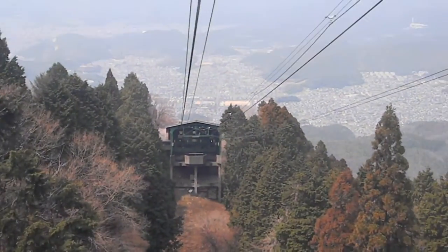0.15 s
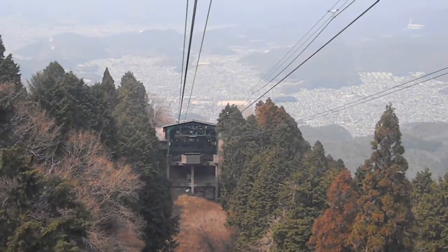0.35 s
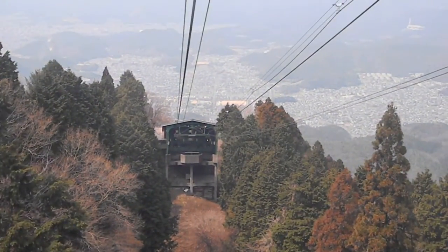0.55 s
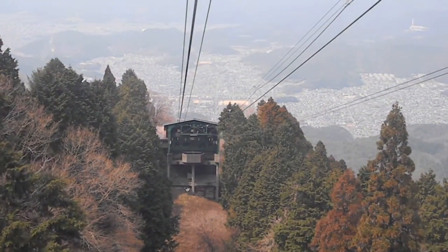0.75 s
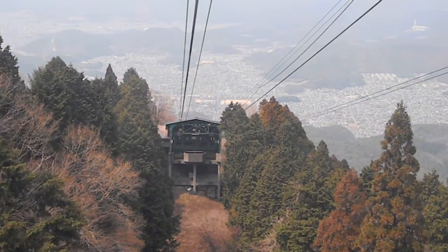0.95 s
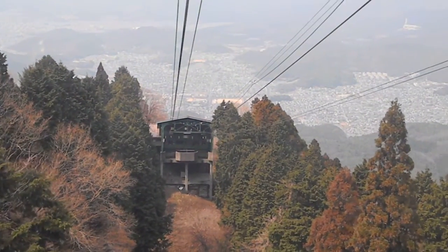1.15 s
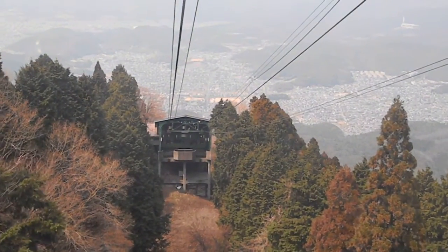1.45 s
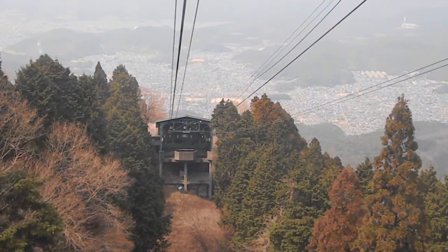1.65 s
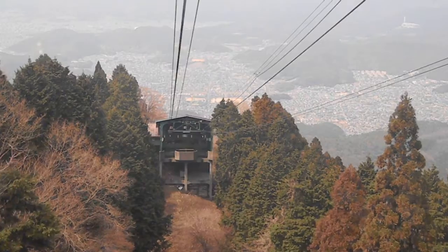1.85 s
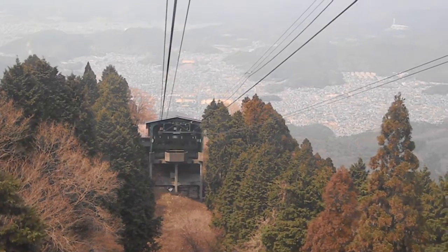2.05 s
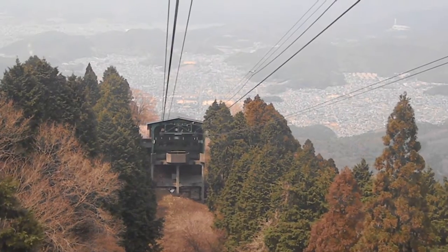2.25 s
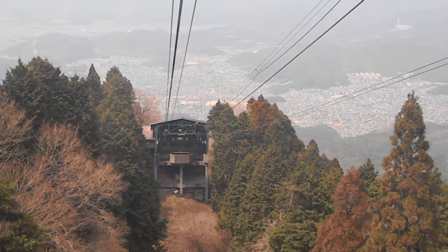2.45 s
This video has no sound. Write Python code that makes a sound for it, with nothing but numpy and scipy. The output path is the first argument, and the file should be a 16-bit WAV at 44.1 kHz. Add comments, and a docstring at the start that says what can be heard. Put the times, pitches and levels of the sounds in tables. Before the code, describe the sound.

Inside a moving cable car cabin, a deep rumble throbs unevenly under a wavering low hum, with panels buzzing softly; small ticks and knocks come and go, and one clearer scuff sounds half way.

```python
"""A deep rumble fills a cable car cabin gliding along its ropes: noise shaped by low modes, with short throbs.
A wandering sine near 200 Hz hums and fades late; the carriage's rolling noise rings in the cabin's panels.
Enveloped noise makes three scuffs, the strongest half way, and the light knocks of fittings, each with a contact.
Decaying pulses make thin ticks; faint whines, a narrow singing band and a hiss of air lie behind."""
import sys
import numpy as np
from scipy import signal
from scipy.fft import rfft, irfft
from scipy.io import wavfile

SR = 44100
rng = np.random.default_rng(int(sys.argv[2]) if len(sys.argv) > 2 else 0)


def store_wav(level_fs):
    """Save 16-bit WAV to argv[1]."""
    pcm = np.round(np.clip(np.atleast_2d(level_fs), -1, 1) * 32767)
    wavfile.write(sys.argv[1], SR, pcm.T.astype(np.int16))


N = 114660
SIDES = np.array([[.5], [-.5]])  # shares a left-right difference between left and right


def amp(db):
    """Logarithmic level: decibels become a linear gain."""
    return 10 ** (np.asarray(db) / 20)


def evened(x):
    """Normalisation: the signal is scaled to rms 1."""
    return x / np.sqrt(np.mean(x ** 2) + 1e-20)


def bins(size=N):
    """Fourier analysis: the frequencies in Hz of a spectrum of the given length."""
    return np.fft.rfftfreq(size, 1 / SR)


def read(points, hz):
    """Interpolation on a logarithmic frequency axis."""
    f, value = np.transpose(points)
    return np.interp(np.log(hz + 1), np.log(f + 1), value)


def curve(points, axis=1):
    """Linear interpolation of one table column over time."""
    rows = np.array(points)
    return np.interp(np.arange(N) / SR, rows[:, 0], rows[:, axis])


def lifts(modes, hz):
    """Resonance: each mode raises or lowers the spectrum in dB around its frequency."""
    return sum(db / (1 + (2 * (hz - f) / width) ** 2) for f, width, db in modes)


def noise(db, same, size=N):
    """Partial coherence: a shared and an opposed random-phase spectrum make stereo noise of rms 1."""
    shared, opposed = np.exp(2j * np.pi * rng.random((2, size // 2 + 1)))
    same = np.clip(same, -1, 1)
    mid = shared * np.sqrt(1 + same)
    side = opposed * np.sqrt(1 - same)
    return evened(irfft(np.array([mid + side, mid - side]) * amp(db), size))


def drift(rate_hz):
    """Random modulation: low-passed noise of rms 1, without its mean."""
    hz = bins()
    lowpass = (hz > 0) / (1 + (hz / rate_hz) ** 4)
    return evened(irfft(rfft(rng.standard_normal(N)) * lowpass, N))


def add(mix, s, sound):
    """Superposition: a sound is summed into the mix from time s in seconds."""
    start = round(s * SR)
    sound = sound[..., max(-start, 0):]
    part = mix[:, max(start, 0):][:, :sound.shape[-1]]
    part += sound[..., :part.shape[1]]


# Spectrum of the cabin rumble. Each row: frequency in Hz, relative density in dB per Hz.
RUMBLE_SPECTRUM = [(10, -36), (24, -21.5), (35, -27.5), (44, 0.5), (55, -4), (80, 0), (105, -0.5), (135, 0),
                   (165, -5.5), (220, -5.5), (262, -1), (295, -7.5), (322, -14.5), (400, -17.5),
                   (520, -34.5), (1000, -65.5), (3000, -100)]
# Modes of the cabin. Each row: frequency in Hz, width in Hz, lift in dB (negative for a dip).
CABIN_MODES = [(44.4, 12, 2.5), (70, 9.1, 8), (86, 1.6, -11), (130.3, 3.8, -1), (139, 1.2, 7.5),
               (156.5, 2.2, 6.5), (182.4, 0.53, 15.5), (248, 1.4, 3), (271.3, 8.4, 2.5), (294, 1.4, -0.5),
               (356.6, 6.1, 8)]
# Left-right likeness of the rumble. Each row: frequency in Hz, correlation from -1 to 1.
RUMBLE_LIKENESS = [(25, 0.63), (50, 1), (100, 0.99), (250, 0.98)]
# Stereo balance of the rumble. Each row: frequency in Hz, left minus right in dB.
RUMBLE_BALANCE = [(50, -1.9), (110, 0.5), (200, 0), (300, -2.5), (380, -1.5), (450, -9.5)]


def rumble(level_db=-12):
    """Modal resonance: the cabin shell booms in its low modes; the level is that before swelling()."""
    hz = bins()
    spectrum = read(RUMBLE_SPECTRUM, hz) + lifts(CABIN_MODES, hz)
    balance = SIDES * read(RUMBLE_BALANCE, hz)
    return noise(spectrum + balance, read(RUMBLE_LIKENESS, hz)) * amp(level_db)


# Throbs of the cabin shell as the carriage jolts.
# Each row: time of the crest in seconds, rms level at the crest in dB, pitch at the crest in Hz,
# length in seconds from the crest to 1/e^2 of its amplitude.
SHELL_THROBS = [(.13, -21, 64.6, 0.05), (0.247, -17, 74, 0.025), (.412, -13, 74.9, .035),
                (.573, -17, 76.6, 0.048), (.728, -13.5, 73.9, 0.017), (.88, -15.5, 78.7, 0.043),
                (.963, -19.5, 131, 0.087), (1.032, -12.5, 73.8, 0.023), (1.136, -23, 133.8, 0.06),
                (1.343, -16, 71.2, 0.029), (1.4, -15, 142, 0.04), (1.479, -12.5, 135.7, 0.045),
                (1.491, -11.5, 68.5, .025), (1.636, -14.5, 82.7, 0.031), (1.943, -13.5, 76, 0.024),
                (2.047, -10.5, 137.7, 0.045), (2.216, -19, 65.2, 0.035), (2.234, -13.5, 132, 0.052),
                (2.395, -15.5, 84.8, 0.026), (2.554, -10, 85, 0.032)]


def throb(level_db, hz, length, sag=0.0581):
    """Transient modal vibration: a low mode swells and sinks about a central crest while its pitch sags."""
    t = np.arange(-SR // 4, SR // 4) / SR
    pitch = hz * (1 - sag * np.tanh(t / length))
    turns = np.cumsum(pitch) / SR + rng.random()
    swell = np.exp(-2 * (t / length) ** 2)
    return np.sqrt(2) * amp(level_db) * swell * np.sin(2 * np.pi * turns)


HUM_HZ, HUM_WANDER_HZ = 203.4, 1.33  # mean pitch, rms wander
HUM_DB, HUM_FLUTTER_DB = -19.5, 2.25  # base level, rms flutter
# Course of the hum. Each row: time in seconds, change from the base level in dB.
HUM_COURSE = [(0, 1), (.25, -2.5), (.42, 2), (.66, -3), (.79, 3), (.91, -5.5), (1.09, 5), (1.16, 2),
              (1.23, 5.5), (1.4, -0.5), (1.61, -1), (1.73, 3), (1.87, -6.5), (2.1, -11.5), (2.22, 1),
              (2.32, -17), (2.44, -4), (2.6, -25)]


def hum():
    """Frequency and amplitude modulation: one wavering tone from the running gear."""
    turns = np.cumsum(HUM_HZ + HUM_WANDER_HZ * drift(rate_hz=7.6)) / SR
    level_db = HUM_DB + curve(HUM_COURSE) + HUM_FLUTTER_DB * drift(rate_hz=32)
    return np.sqrt(2) * np.sin(2 * np.pi * turns) * amp(level_db)


# Spectrum of the rolling noise. Each row: frequency in Hz, relative density in dB per Hz.
ROLL_SPECTRUM = [(60, -15.5), (250, -16.5), (340, -1.5), (430, 1), (500, -6.5), (700, -7), (820, -10),
                 (1050, -10.5), (1110, -18.5), (1600, -18), (1950, -20), (2200, -27), (2800, -32),
                 (4000, -39), (7000, -58.5), (16000, -73)]
# Ringing panels. Each row: frequency in Hz, width in Hz, lift in dB.
PANEL_MODES = [(359, 2.8, 9), (410, 30, 7.5), (531, 80, 5), (567, 32, 3.5), (660, 11, 2), (690, 12, -0.5),
               (717, 9.7, -0.5), (738, 9.1, 9.5), (874, 20, 7), (942, 26, 6), (1002, 7.3, 0.5),
               (1026, 20, 4.5), (1207, 13, 8), (2424, 89, 7.5), (3720, 130, 1.5)]
# Stereo balance of the rolling. Each row: frequency in Hz, left minus right in dB.
ROLL_BALANCE = [(200, -1), (420, -9.5), (470, 1), (510, -2.5), (560, -9.5), (950, -4.5), (1030, -5),
                (1150, -4), (1220, -2), (1500, -3.5), (2500, -1.5), (4000, 1)]
# Left-right likeness of the rolling, shared by the singing. Each row: frequency in Hz, correlation from -1 to 1.
ROLL_LIKENESS = [(200, 0.27), (450, 1), (700, 0.85), (1000, 0.38), (2000, 0.14), (4000, 0.22)]
# Stereo phase of the rolling. Each row: frequency in Hz, lead of the left in radians.
ROLL_LEAD = [(200, .3), (400, 1.21), (600, 1.94), (1000, 1.2), (3000, 2)]


def rolling(level_db=-28, flutter_db=1.12):
    """Forced vibration: wheels on the rope excite the panels, mostly on the right; level before swelling()."""
    hz = bins()
    z = rfft(noise(read(ROLL_SPECTRUM, hz) + lifts(PANEL_MODES, hz), read(ROLL_LIKENESS, hz)))
    z = z * amp(SIDES * read(ROLL_BALANCE, hz))
    z = z * np.exp(1j * SIDES * read(ROLL_LEAD, hz))
    return evened(irfft(z, N)) * amp(level_db + flutter_db * drift(rate_hz=22))


# Pitches that mostly cancel at the listener's place in the cabin.
# Each row: frequency in Hz, width in Hz, change in dB (one is a slight lift).
CABIN_NULLS = [(205, 10, -15), (270.6, 4.3, -3.5), (318, 5.8, 2), (383.2, 15.3, -8), (490, 14, -3.5),
               (540, 3.8, -2.5), (895, 16, -6), (854, 9, -4.5)]
# Centres in Hz of the five overlapping bands of the ride noise, from bass to top.
BAND_CENTRES = [75, 140, 260, 400, 800]
# Course of the bands. Each row: time in seconds, then the change in dB of the bass, low middle, middle,
# upper middle and top.
BAND_COURSE = [(0, 7.5, -9, 2, -1, 0.5), (.2, -8, 3, 1.5, -2, 0), (.38, 1.5, -3.5, -1, 1.5, 2),
               (.5, -4, -7, 5, -3, 0), (.64, -5, 0, 0.5, -0.5, 0), (.85, -6.5, 2.5, 2, -1.5, -2),
               (1.03, -7.5, 0, -1, -1.5, -0.5), (1.27, -4.5, 0, 1, -1.5, 1), (1.48, -8, -4.5, 2, -5, -1),
               (1.65, -4, -0.5, 1.5, -0.5, 1.5), (1.85, -4.5, 0, 2, -1, -1.5),
               (2.03, -3.5, 0.5, -1.5, 0.5, 1), (2.23, 2.5, 0.5, 0, 4, 0.5), (2.43, -2.5, -2, -1, 3.5, 0.5),
               (2.6, -9, 1, 2.5, 3, 3.5)]


def swelling(x):
    """Interference and band modulation: a few pitches cancel; each band rises and sinks on its own."""
    hz = bins()
    z = rfft(x) * amp(lifts(CABIN_NULLS, hz))
    out = 0
    for k, share in enumerate(np.eye(len(BAND_CENTRES))):
        crossfade = read(list(zip(BAND_CENTRES, share)), hz)
        band = irfft(z * crossfade, N)
        out = out + band * amp(curve(BAND_COURSE, axis=k + 1))
    return out


SCUFF_RISE_S, SCUFF_LIKENESS, SCUFF_TREBLE_DB_PER_S = 0.0044, 0.55, 49  # the last is extra treble decay
SCUFF_LEAD_S, SCUFF_LEAD_DB = .03, -12  # a lighter touch swells just before each scuff bites
# Scuffs. Each row: time of the bite in seconds, level in dB, hold in seconds, 60 dB decay in seconds.
SCUFF_EVENTS = [(0.096, -44, 0.0037, 0.14), (1.26, -38, 0.03, 0.38), (2.206, -48, 0.011, 0.17)]
# Spectrum of a scuff. Each row: frequency in Hz, relative density in dB per Hz.
SCUFF_SPECTRUM = [(600, -25), (1400, -13.5), (2100, -0.5), (3000, -1), (4000, 2), (5000, -4), (7000, -6.5),
                  (9000, -7), (12000, -18), (16000, -20.5)]
# Metallic ring of a scuff. Each row: frequency in Hz, width in Hz, lift in dB.
SCUFF_MODES = [(3900, 60, 3), (3800, 260, 3.3), (3080, 200, 2.4), (4330, 230, 3.5), (4750, 140, 2.5),
               (5210, 70, 3.5), (5530, 100, 2.8), (5900, 170, 4), (8150, 120, 4)]


def scuff(level_db, hold, t60, grain_db=-0.5, split_hz=6000):
    """Sliding friction: a short grainy rub with a metallic ring; its treble dies first."""
    t, hz = np.arange(SR) / SR - SCUFF_LEAD_S, bins(SR)
    rub = noise(read(SCUFF_SPECTRUM, hz) + lifts(SCUFF_MODES, hz), SCUFF_LIKENESS, size=SR)
    body = irfft(rfft(rub) / (1 + (hz / split_hz) ** 4), SR)
    treble = rub - body
    rub = body + treble * amp(-SCUFF_TREBLE_DB_PER_S * np.maximum(t, 0))
    touch = amp(SCUFF_LEAD_DB) * np.minimum(t / SCUFF_LEAD_S + 1, 1)
    bite = np.clip(t / SCUFF_RISE_S + 1, 0, 1)
    decay_db = -60 * np.maximum(t - hold, 0) / t60
    grain = grain_db * drift(rate_hz=620)[:SR]
    return rub * np.maximum(bite, touch) * amp(level_db + decay_db + grain)


KNOCK_RISE_S, KNOCK_LIKENESS, KNOCK_CHATTER_DB = 0.0033, 0.62, 1.5
CONTACT_DB = 9  # peak of the contact over the rattle's level
# Light knocks. Each row: start in seconds, rattle level before rise and decay in dB, centre in Hz,
# spread in octaves, 60 dB decay in seconds.
KNOCK_EVENTS = [(0.096, -49, 7140, 1.2, 0.044), (.463, -47, 4250, 0.21, 0.048),
                (0.618, -34.5, 1200, 0.28, 0.038), (0.721, -47.5, 4540, 0.41, 0.079),
                (0.799, -41.5, 2040, 0.51, .03), (0.92, -42, 3370, .13, 0.054),
                (.9205, -37, 1640, 0.28, .02), (1.067, -51, 4170, 0.33, .06),
                (1.09, -43.5, 9000, .6, 0.028), (1.129, -49.5, 3970, 0.27, 0.05),
                (1.205, -49, 6000, 1, 0.077), (1.257, -27, 3200, 1.1, 0.031), (2.01, -45, 4540, 1.1, 0.011),
                (2.042, -42.5, 5000, 0.55, 0.023), (2.073, -38.5, 4500, 1.1, .022),
                (2.093, -52.5, 4700, 0.4, .08), (2.11, -43, 4160, 0.55, 0.055),
                (2.109, -36.5, 1770, 0.11, 0.071), (2.149, -47, 5000, 1, 0.054), (2.167, -40, 4800, 1, .03),
                (2.201, -42.5, 3200, 1.3, 0.06), (2.425, -50, 8000, 0.55, 0.067)]


def knock(level_db, centre_hz, spread, t60):
    """Impact excitation: a loose fitting makes a sharp contact and a quickly damped rattle."""
    size = SR // 2
    t, hz = np.arange(size) / SR, bins(size)
    octaves = np.log2((hz + 1) / centre_hz)
    colour = -20 * np.log10(1 + (octaves / spread) ** 2)
    envelope = np.minimum(t / KNOCK_RISE_S, 1) * amp(-60 * t / t60)
    chatter = evened(amp(KNOCK_CHATTER_DB * drift(rate_hz=600)[:size]))
    rattle = noise(colour, KNOCK_LIKENESS, size=size) * envelope * chatter
    # the contact is a coloured impulse, placed where the rattle has risen
    contact = np.roll(irfft(amp(colour), size), round(KNOCK_RISE_S * SR))
    return amp(level_db) * (rattle + amp(CONTACT_DB) * contact / abs(contact).max())


TICK_DECAY_S, TICK_LOW_HZ = .00002, 3000  # time constant, high-pass corner
# Thin ticks. Each row: start in seconds, peak before the high-pass in dB.
TICK_EVENTS = [(.037, -31), (0.3994, -23), (0.418, -25), (0.622, -25.5), (.803, -32), (1.044, -42),
               (1.223, -26), (1.4744, -29), (1.872, -28), (2.275, -25.5), (2.572, -34)]


def tick(peak_db):
    """Impulse: a very short, dry, high-passed decay, equal in both channels."""
    t = np.arange(SR // 20) / SR
    highpass = signal.butter(1, TICK_LOW_HZ, "high", fs=SR)
    return amp(peak_db) * signal.lfilter(*highpass, np.exp(-t / TICK_DECAY_S))


WHINE_FLUTTER_DB, WHINE_BALANCE_DB, WHINE_LEAD_RAD = 4.5, -1.5, 0.99  # balance and lead: left against right
# Faint whines of the running gear. Each row: pitch in Hz, level in dB, rms wander in Hz.
GEAR_WHINES = [(567, -53.5, 2.9), (602.5, -49, 2.3), (931, -60.5, 2), (1034, -54, 2.8), (2397, -69, 12)]


def whine(hz, level_db, wander_hz):
    """Frequency and amplitude modulation: a thin, unsteady tone, slightly stronger on the right."""
    turns = np.cumsum(hz + wander_hz * drift(rate_hz=12.0)) / SR
    gain = amp(level_db + WHINE_BALANCE_DB * SIDES + WHINE_FLUTTER_DB * drift(rate_hz=10))
    return np.sqrt(2) * np.sin(2 * np.pi * turns + WHINE_LEAD_RAD * SIDES) * gain


SING_HZ, SING_WIDTH_HZ = 3810, 70  # centre, width between the -6 dB points
SING_DB, SING_FLUTTER_DB = -69.5, 3.5  # base level, rms flutter
# Course of the singing. Each row: time in seconds, change from the base level in dB.
SING_COURSE = [(0, -1), (.6, -2.5), (.9, -6), (1.4, -0.5), (1.68, -0.5), (1.85, -5), (2.15, -5), (2.4, 3),
               (2.6, -3)]


def singing():
    """Narrow-band noise: a faint, breathy ring high above the ride, coming and going."""
    hz = bins()
    band = -20 * np.log10(1 + (2 * (hz - SING_HZ) / SING_WIDTH_HZ) ** 2)
    level_db = SING_DB + curve(SING_COURSE) + SING_FLUTTER_DB * drift(rate_hz=16)
    return noise(band, read(ROLL_LIKENESS, hz)) * amp(level_db)


# Spectrum of the air hiss. Each row: frequency in Hz, relative density in dB per Hz.
HISS_SPECTRUM = [(500, -15), (2500, 3.5), (4500, 0.5), (6500, -3), (9500, -4.5), (13000, -12), (16000, -9)]
# Course of the hiss. Each row: time in seconds, change from the base level in dB.
HISS_COURSE = [(0, -2.5), (.14, 4), (.2, 0.5), (.47, 0.5), (.54, -2.5), (.6, 1.5), (.67, -5), (1, -1),
               (1.1, 1), (1.42, -0.5), (1.52, -4.5), (1.6, 0.5), (1.72, -0.5), (1.77, -3), (1.85, 0.5),
               (1.92, -2.5), (1.97, -1.5), (2.03, -1.5), (2.2, 5), (2.33, -1), (2.45, 2.5), (2.6, -0.5)]
# Left-right likeness of the hiss. Each row: frequency in Hz, correlation from -1 to 1.
HISS_LIKENESS = [(3000, .1), (6000, 0.13), (9000, 0.37), (15000, .55)]


def hiss(base_db=-55.5, flutter_db=1.47):
    """Broadband noise: a faint hiss of air, modulated unevenly in level."""
    hz = bins()
    level_db = base_db + curve(HISS_COURSE) + flutter_db * drift(rate_hz=39)
    return noise(read(HISS_SPECTRUM, hz), read(HISS_LIKENESS, hz)) * amp(level_db)


def scene():
    """Superposition: the steady ride is summed with its throbs and small noises."""
    out = swelling(rumble() + rolling()) + hum()
    out = out + sum(whine(*row) for row in GEAR_WHINES) + singing() + hiss()
    for crest_s, *row in SHELL_THROBS:
        lump = throb(*row)
        add(out, crest_s - len(lump) / SR / 2, lump)
    for s, *row in SCUFF_EVENTS:
        add(out, s - SCUFF_LEAD_S, scuff(*row))
    for s, *row in KNOCK_EVENTS:
        add(out, s, knock(*row))
    for s, peak_db in TICK_EVENTS:
        add(out, s, tick(peak_db))
    return out


CEILING, KNEE = .95, .75  # amplitude limit of the rounding, and where it begins
EDGE_HZ = 15850  # upper band limit


def record(dry):
    """Soft saturation and band limiting: peaks above the knee are rounded, then a low-pass follows."""
    room = max(CEILING - KNEE, .05)
    excess = np.maximum(abs(dry) - KNEE, 0)
    rounded = np.clip(dry, -KNEE, KNEE) + np.sign(dry) * room * np.tanh(excess / room)
    lowpass = signal.firwin(511, EDGE_HZ, window=("kaiser", 9), fs=SR)
    return signal.oaconvolve(rounded, lowpass[None], "same")


dry = scene()
out = record(dry)
store_wav(out)
```